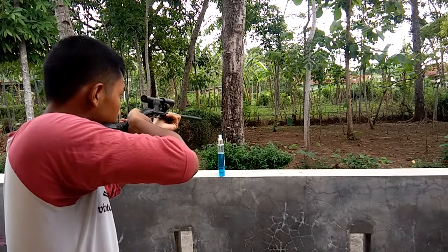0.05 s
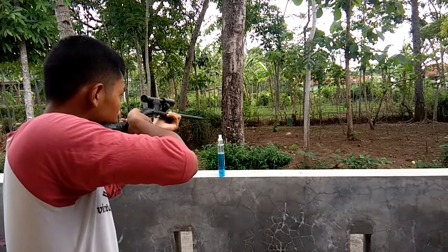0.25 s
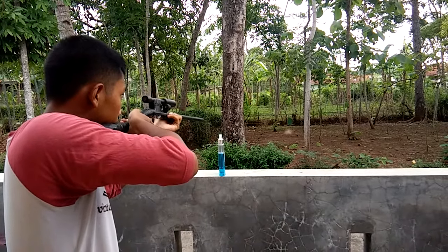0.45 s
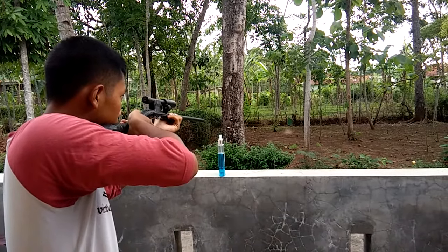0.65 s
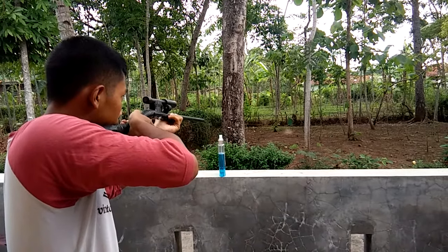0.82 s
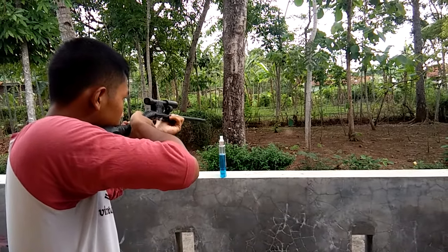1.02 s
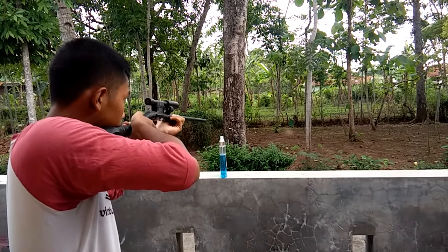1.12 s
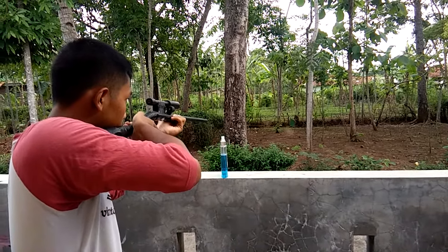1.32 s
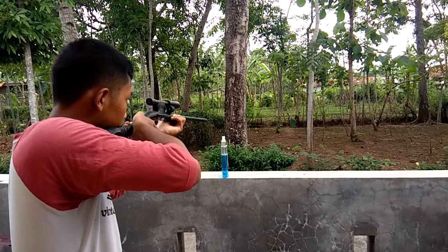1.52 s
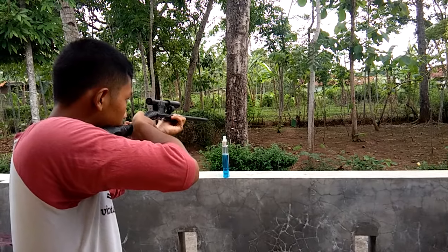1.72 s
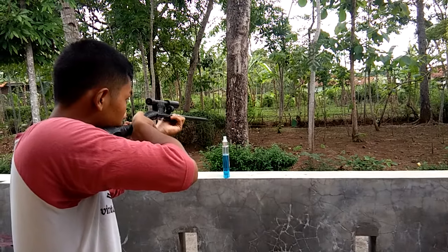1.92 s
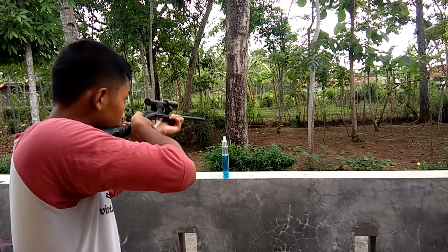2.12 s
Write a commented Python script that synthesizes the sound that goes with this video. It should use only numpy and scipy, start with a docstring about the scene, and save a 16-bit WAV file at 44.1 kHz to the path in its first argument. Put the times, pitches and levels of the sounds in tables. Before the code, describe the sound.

One close air rifle shot cracks and echoes in a garden, then the pellet clicks faintly.

```python
"""In a garden, an air rifle fires once, so close to the microphone that it overloads.
The trigger clicks, escaping air hisses, then the muzzle cracks with a low thump and the barrel rings.
Walls and trees throw the bang back. The pellet clicks on something far off,
and a faint tick follows over a quiet outdoor rumble."""
import sys
import numpy as np
from scipy import signal
from scipy.fft import rfft, irfft
from scipy.io import wavfile

SR = 44100
rng = np.random.default_rng(int(sys.argv[2]) if len(sys.argv) > 2 else 0)


def store_pcm(level_fs):
    """Save levels as 16-bit WAV."""
    pcm = np.round(np.clip(level_fs, -1, 1) * 32767).astype(np.int16)
    wavfile.write(sys.argv[1], SR, np.atleast_2d(pcm).T)


N = 94815
BANG_S = .2212  # when the muzzle cracks


def amp(db):
    return 10 ** (np.asarray(db) / 20)


def unit(x):
    """Scales a sound to an average (RMS) strength of 1."""
    return x / np.sqrt(np.mean(x ** 2) + 1e-20)


def read(points, hz):
    """Looks up a table between its rows, on a log-frequency axis."""
    f, value = np.transpose(points)
    return np.interp(np.log(hz + 1), np.log(f + 1), value)


def since(start):
    return np.arange(N) / SR - start


def decay(start, t60, rise=.0003):
    """A quick rise, then a fall; t60 is the time it takes to drop by 60 dB."""
    t = np.maximum(since(start), 0)
    return np.minimum(t / rise, 1) * np.exp(-np.log(1000) * t / t60)


def noise(spectrum):
    """Noise of strength 1; the table sets only the balance of low and high."""
    gain = amp(read(spectrum, np.fft.rfftfreq(N, 1 / SR)))
    return unit(irfft(rfft(rng.standard_normal(N)) * gain, N))


def resonant(peaks):
    """Noise of strength 1, gathered around a few pitches."""
    f = np.fft.rfftfreq(N, 1 / SR)
    gain = sum(amp(db) / (1 + (2 * (f - hz) / width) ** 2) for hz, width, db in peaks)
    return unit(irfft(rfft(rng.standard_normal(N)) * gain, N))


def ring(start, tones):
    """The tones of a struck object, each dying away."""
    t = since(start)
    return sum(amp(db) * decay(start, t60, rise=.00021) * np.sin(2 * np.pi * (hz * t + rng.random()))
               for hz, db, t60 in tones)


def fade(sound, start, t60s, rise):
    """Starts a noise and lets each frequency band die at its own speed."""
    hz, t, bands = signal.stft(sound, SR, nperseg=256)
    fall = np.exp(-np.log(1000) * np.maximum(t - start, 0) / read(t60s, hz)[:, None])
    faded = signal.istft(bands * fall, SR, nperseg=256)[1][:N]
    return faded * np.clip(since(start) / rise, 0, 1)


def ambience():
    """A quiet distant rumble and thin hiss; a faint hum slowly grows out of them."""
    # outdoor background: f/Hz, level/dB
    rumble = [(15, -18), (30, -11), (50, 0), (100, -1), (155, -5), (250, -13), (380, -13), (600, -21),
              (1100, -25), (3000, -29), (6000, -35.5), (12000, -32.5), (15500, -37.5)]
    # distant hum: f/Hz, width/Hz, level/dB
    hum = [(152, 9, 0), (218, 12, -7), (350, 40, -10)]
    t = since(N / SR / 2)  # seconds from the middle of the scene
    return noise(rumble) * amp(-70.5 + .5 * t) + resonant(hum) * amp(-80 + 5 * t)


def garden():
    """Nearby leaves scatter the bang into a short tail; far trees add a faint, longer roll."""
    # scatter from the leaves: f/Hz, level/dB
    leaves = [(60, -10), (170, -12.5), (330, 0), (650, -6), (950, 1.5), (1200, -6), (2000, 0), (3200, 1.5),
              (5000, -1.5), (6900, -2), (7700, -10.5), (12500, -5), (15500, -11)]
    # how long it lasts: f/Hz, t60/s
    leaves_t60 = [(60, 0.77), (200, .42), (450, 0.35), (1000, 0.43), (1900, 0.47), (4000, .4), (6500, .43),
                  (8500, .34), (15000, 0.36)]
    # roll from the far trees: f/Hz, level/dB
    woods = [(100, -9), (700, -4.5), (1800, 1), (4000, -1), (7000, -12), (15000, -22)]
    near = fade(noise(leaves), BANG_S, leaves_t60, rise=.043)
    far = noise(woods) * decay(BANG_S, t60=1.2, rise=.043)
    return amp(-9.5) * near + amp(-48.5) * far


def echoes():
    """The crack comes back from walls and trunks, smeared, thinner and duller."""
    # echoes: arrival t/s, level/dB, dull above f/Hz
    arrivals = [(.2435, -5.5, 9000), (0.2595, -3, 10000), (0.327, -22, 2200), (0.3391, -11, 6000),
                (0.4042, -31, 5000), (0.4643, -33, 2990)]
    # sound of one echo: f/Hz, level/dB
    slap_spectrum = [(100, -18), (350, -1.5), (650, -9), (1100, -2.5), (2000, -0.5), (2800, 5), (4200, -4),
                     (7000, -9), (11000, -5), (15500, -10)]
    out = np.zeros(N)
    for start, db, hz in arrivals:
        slap = noise(slap_spectrum) * decay(start, t60=.02, rise=.0011)
        low_pass = signal.butter(1, hz, fs=SR)
        out += amp(db) * signal.lfilter(*low_pass, slap)
    return out


def impacts():
    """The pellet strikes far off and a faint tick follows; the trees scatter both."""
    # hits: t/s, then level/dB of the ring, snap, scattered ring and scattered snap
    hits = [(0.5988, -38.5, -50, -50.5, -62), (0.855, -88, -66, -83, -68.5)]
    # ring of the thing hit: f/Hz, width/Hz, level/dB
    target_peaks = [(2960, 370, -2), (3730, 530, -7.5), (4180, 350, 4.5), (4606, 334, -8), (5307, 420, 5)]
    # sharp snap of a hit: f/Hz, level/dB
    snap_spectrum = [(300, -8.5), (2000, -5.5), (4500, 2.5), (7500, -4), (10000, 4.5), (12300, 3.5),
                     (15500, -12)]
    # how long the scatter around the target lasts: f/Hz, t60/s
    scatter_t60 = [(1000, 0.63), (4200, 0.33), (8000, 0.28), (14000, 0.22)]
    out = np.zeros(N)
    for start, ring_db, snap_db, far_ring_db, far_snap_db in hits:
        body, snap = resonant(target_peaks), noise(snap_spectrum)
        ping = ring(start, [(5350, -6, .018)])  # f/Hz, level/dB, t60/s
        out += amp(ring_db) * (ping + body * decay(start, t60=.027, rise=.001))
        out += amp(snap_db) * snap * decay(start, t60=.026, rise=.001)
        scattered = amp(far_ring_db) * body + amp(far_snap_db) * snap
        out += fade(scattered, start, scatter_t60, rise=.018)
    return out


def trigger():
    """The catch inside the trigger lets go with a small metallic click."""
    # ring of the mechanism: f/Hz, level/dB, t60/s
    tones = [(2180, 4, .028), (2620, -4, .03), (3413, -8, .035), (5470, -5.5, 0.018), (8000, 0.5, 0.036),
             (11300, -0.5, .06)]
    # snap of small hard parts: f/Hz, level/dB
    snap = [(200, -18.5), (1200, -11.5), (2500, -4.5), (5000, 1.5), (8000, -3), (12000, 1), (15500, -7.5)]
    start = .1903
    return amp(-33) * ring(start, tones) + amp(-32) * noise(snap) * decay(start, t60=.056)


def air():
    """Escaping air hisses ahead of the bang, swells and dies; the jet whistles briefly."""
    # air flow (a leak, a fast swell, two surges, then the fall): t/s, level/dB
    flow_curve = [(0.193, -37.5), (0.205, -32), (0.2101, -24), (0.2132, -13.5), (.224, -12.5), (.232, -9.5),
                  (.241, -12), (.249, -7.5), (0.263, -14.5), (.28, -17), (0.349, -41), (.47, -88)]
    # bright hiss of the air: f/Hz, level/dB
    hiss = [(100, -17.5), (500, -10), (2000, -6.5), (3300, -12.5), (5000, -1), (7000, -5), (10000, 0.5),
            (12500, 2), (15500, -7)]
    flow = amp(np.interp(since(0), *np.transpose(flow_curve), left=-np.inf, right=-np.inf))
    whistle = resonant([(10020, 700, 0)])  # f/Hz, width/Hz, level/dB
    whistle *= decay(start=.2305, t60=.036, rise=.001)
    return noise(hiss) * flow + amp(-3) * whistle


def barrel():
    """The shot jolts the steel, which rings briefly."""
    # ring of the barrel and mechanism: f/Hz, level/dB, t60/s
    tones = [(442, 0.5, 0.12), (2140, -9.5, 0.18), (3630, -3.5, 0.33), (3740, -4, .17), (3984, -4, 0.16),
             (4459, -2, 0.11), (4400, 0, .17), (4840, -3.5, .17), (9960, -3, .15), (12650, -3, .15)]
    return amp(-14) * ring(BANG_S, tones)


def thump():
    """The push of air pressure: a few low swings that slow down as they fade."""
    start_hz, end_hz, glide_s = 146, 60, .007
    rise_s, length_s = .012, .05168
    t = np.maximum(since(BANG_S), 0)
    hz = end_hz + (start_hz - end_hz) * np.exp(-t / glide_s)
    phase = 2 * np.pi * np.cumsum(hz * (t > 0)) / SR
    level = np.interp(t, [0, rise_s, length_s], [0, 1, 0])
    return -amp(-6) * level * np.sin(phase)


def muzzle():
    """Air bursts from the barrel: a sharp crack and the swirling blast behind it."""
    # muzzle blast: f/Hz, level/dB
    blast_spectrum = [(40, -13), (150, 4.5), (280, 0), (440, 5.5), (600, -4), (1000, -4), (1500, -6),
                      (2100, -1), (2700, -5), (4500, 0), (5800, -15), (7500, -15.5), (10000, -10),
                      (15500, -12)]
    # how long it lasts (the bass dies first): f/Hz, t60/s
    blast_t60 = [(150, 0.14), (450, 0.16), (1500, .18), (4000, 0.17), (12000, 0.22)]
    gas = noise(blast_spectrum)
    crack = gas * decay(BANG_S, t60=.019)
    blast = fade(gas, BANG_S, blast_t60, rise=.0017)
    return amp(2) * crack + amp(-2) * blast


def scene():
    """The rifle and the garden around it, in one channel."""
    rifle = trigger() + air() + muzzle() + barrel() + thump()
    return (rifle + echoes() + garden() + impacts() + ambience())[None]


def record(dry):
    """The bang overloads the microphone, which flattens its peaks; the highest treble is cut."""
    ceiling, hardness, cutoff_hz = .92, 4.6, 15560
    clipped = dry / (1 + abs(dry / ceiling) ** hardness) ** (1 / hardness)
    low_pass = signal.firwin(801, cutoff_hz, window=("kaiser", 8), fs=SR)
    return signal.oaconvolve(clipped, low_pass[None], "same")


dry = scene()
out = record(dry)
store_pcm(out)
```